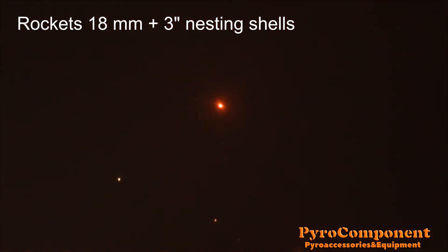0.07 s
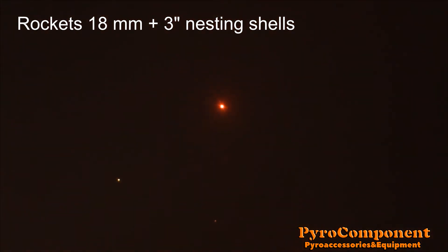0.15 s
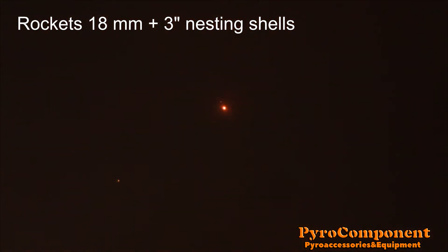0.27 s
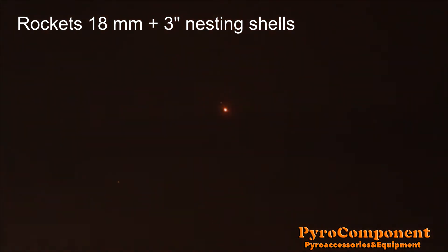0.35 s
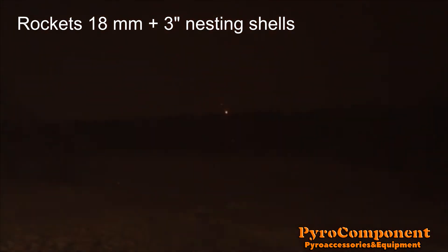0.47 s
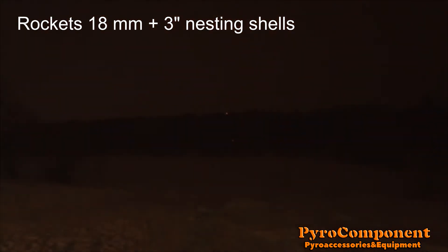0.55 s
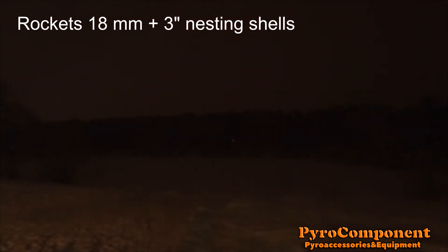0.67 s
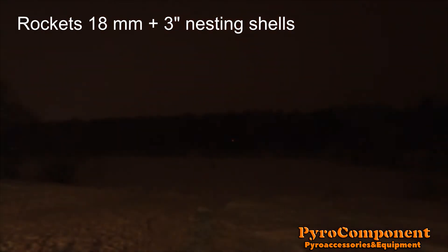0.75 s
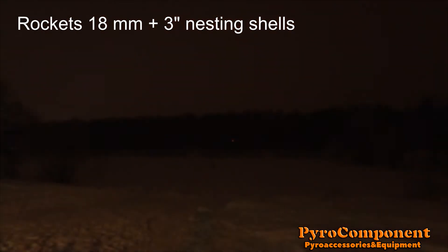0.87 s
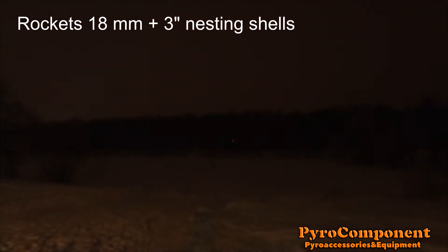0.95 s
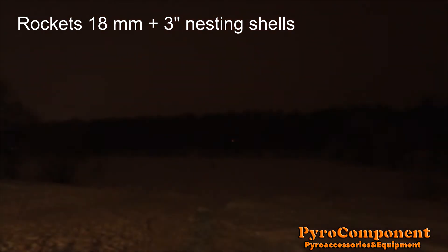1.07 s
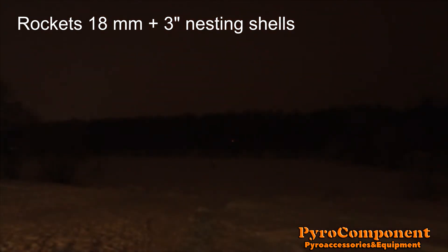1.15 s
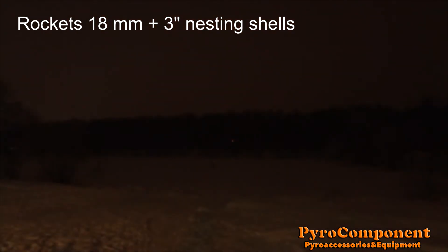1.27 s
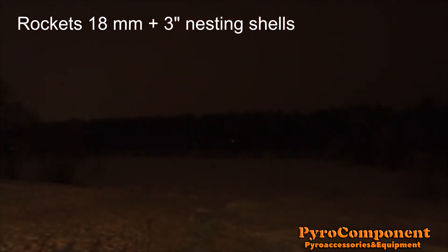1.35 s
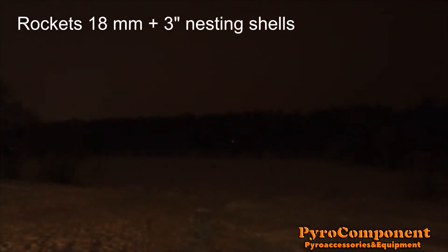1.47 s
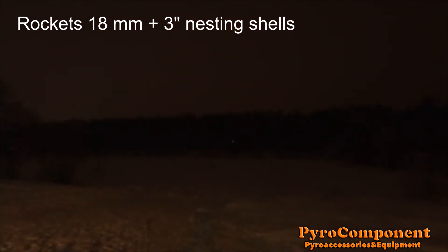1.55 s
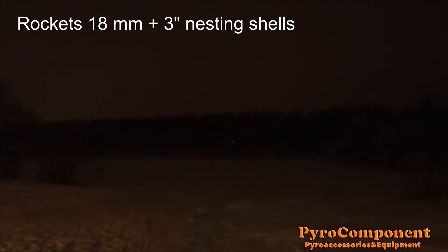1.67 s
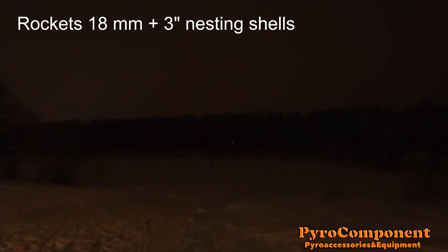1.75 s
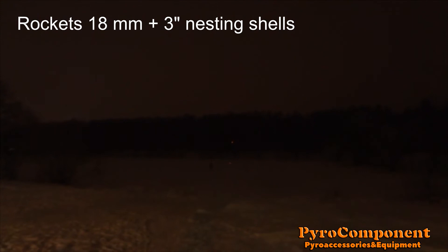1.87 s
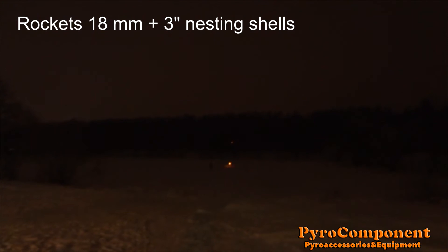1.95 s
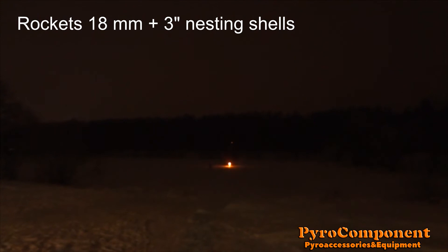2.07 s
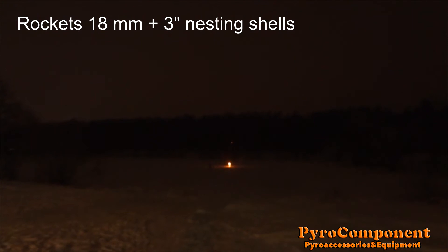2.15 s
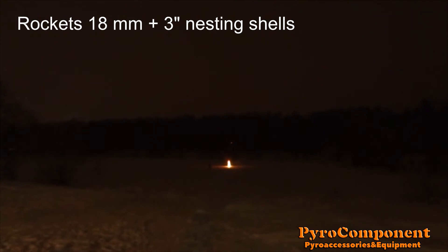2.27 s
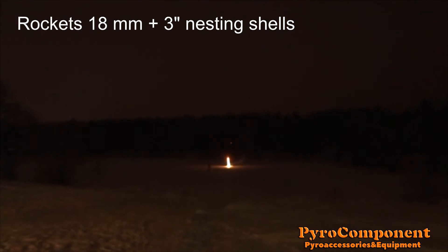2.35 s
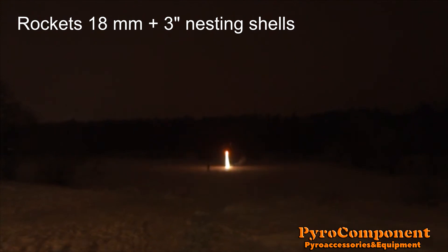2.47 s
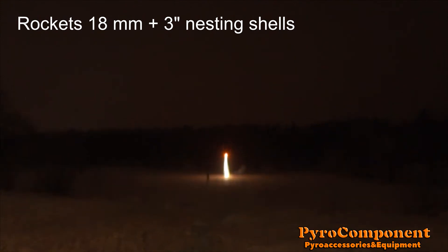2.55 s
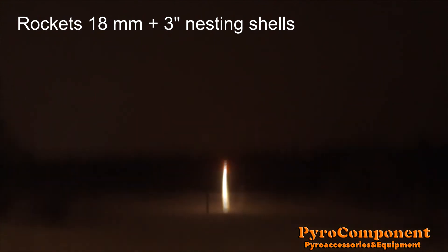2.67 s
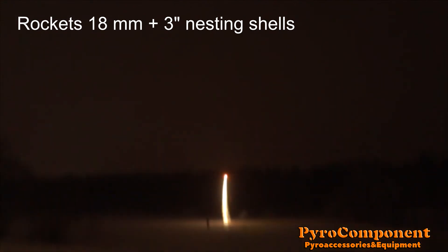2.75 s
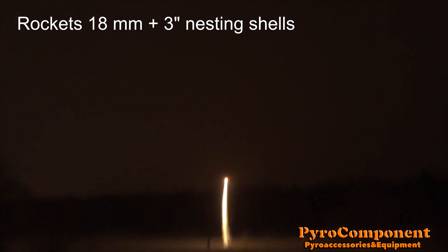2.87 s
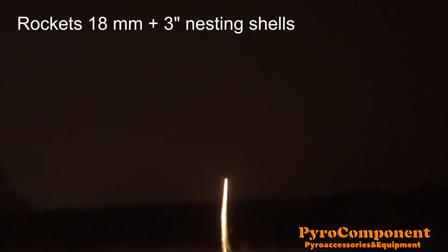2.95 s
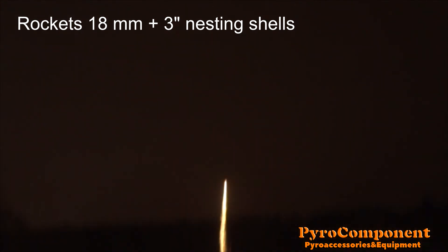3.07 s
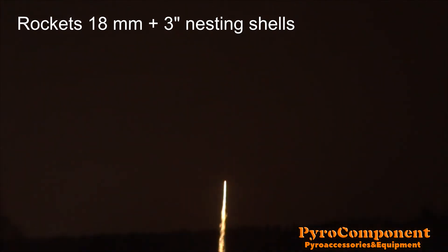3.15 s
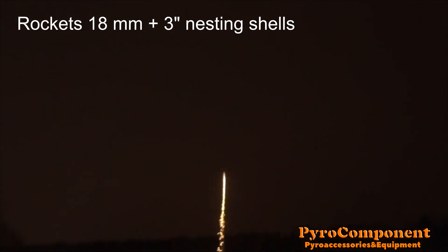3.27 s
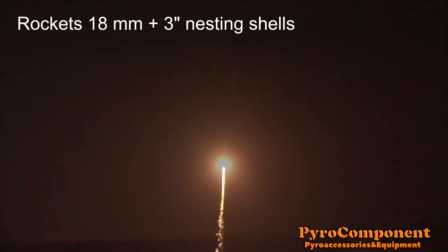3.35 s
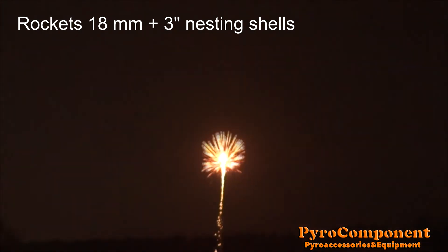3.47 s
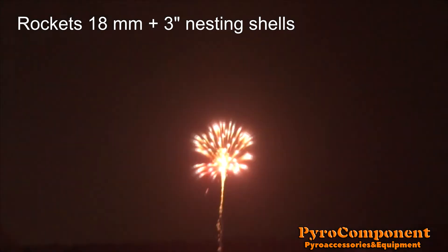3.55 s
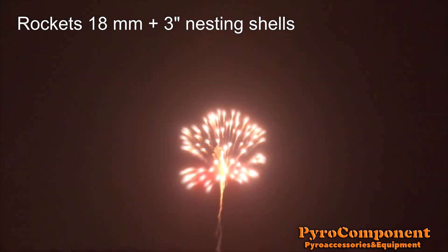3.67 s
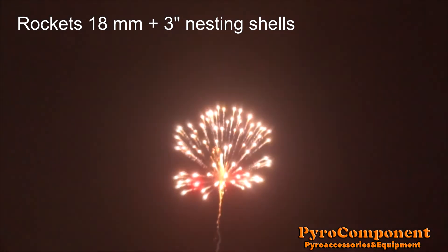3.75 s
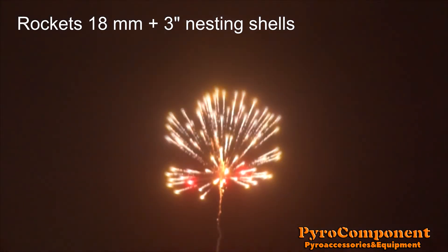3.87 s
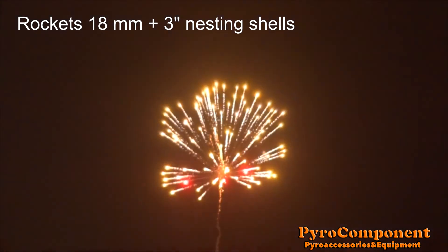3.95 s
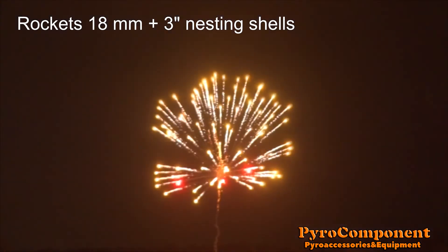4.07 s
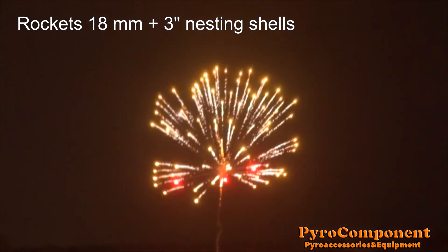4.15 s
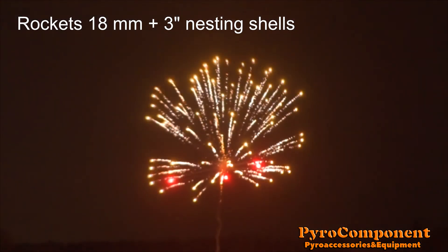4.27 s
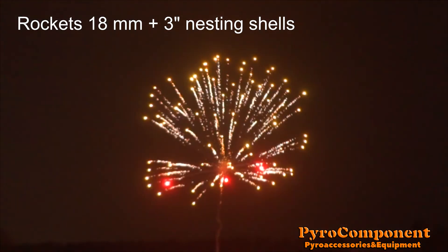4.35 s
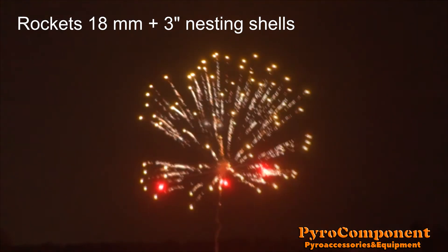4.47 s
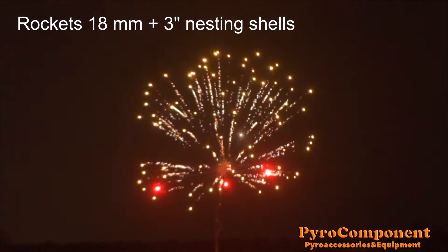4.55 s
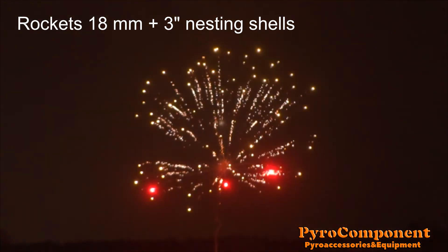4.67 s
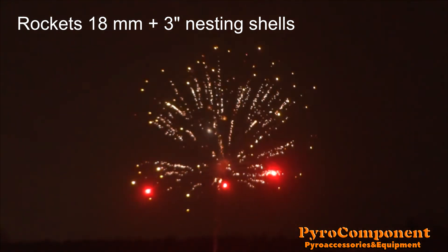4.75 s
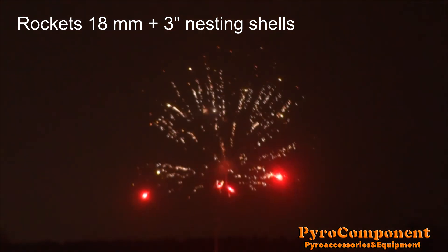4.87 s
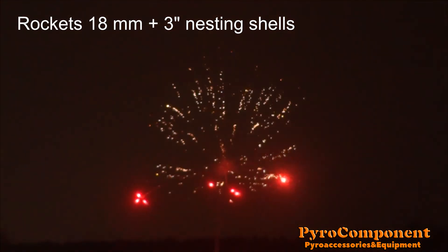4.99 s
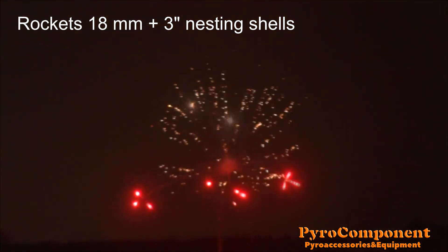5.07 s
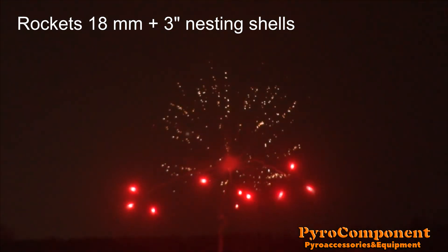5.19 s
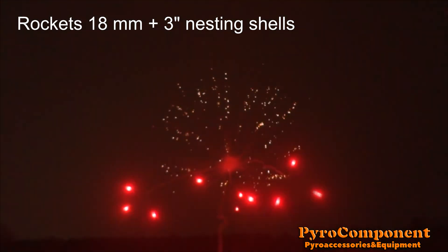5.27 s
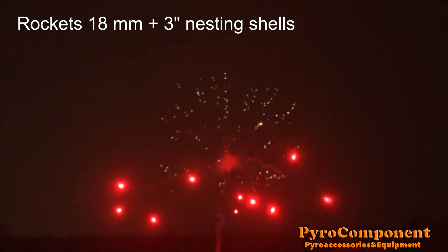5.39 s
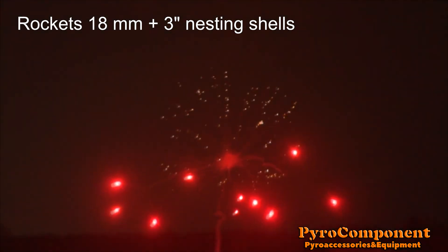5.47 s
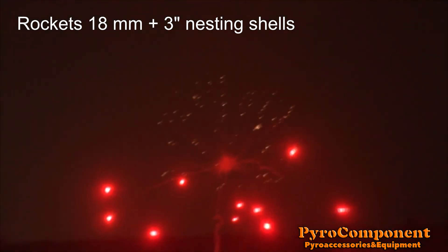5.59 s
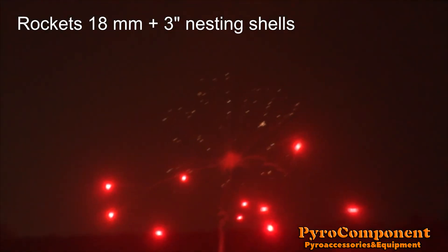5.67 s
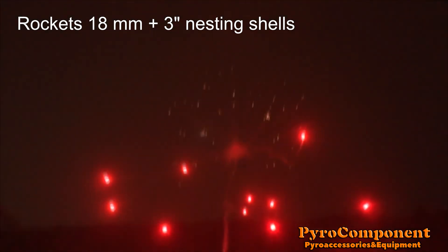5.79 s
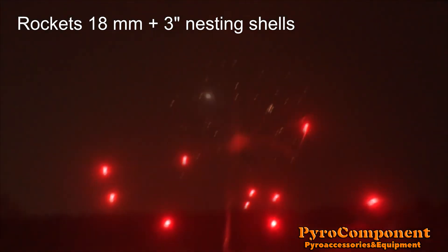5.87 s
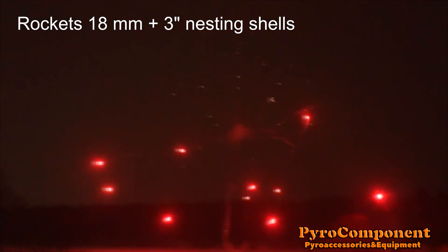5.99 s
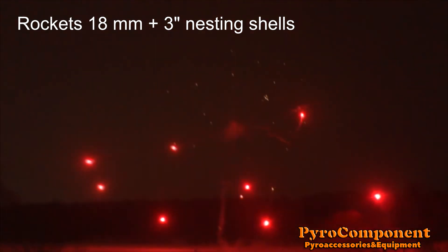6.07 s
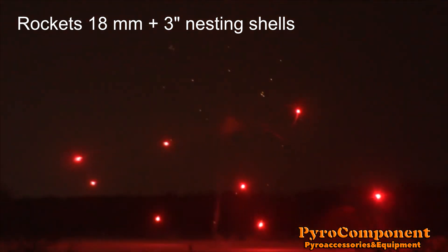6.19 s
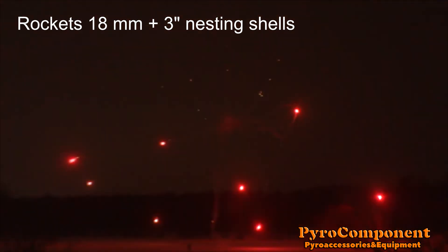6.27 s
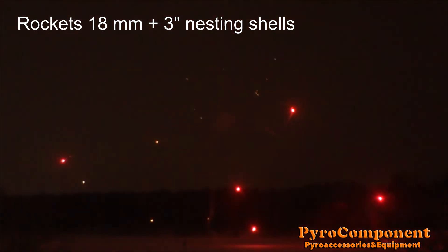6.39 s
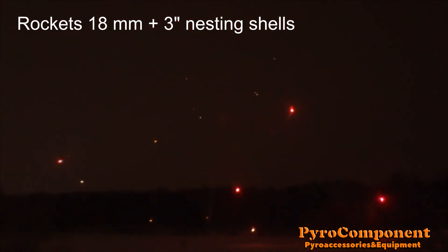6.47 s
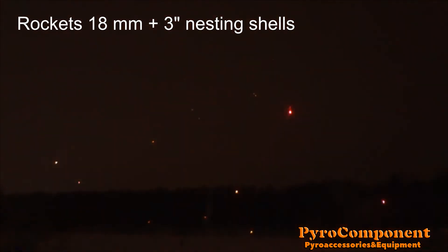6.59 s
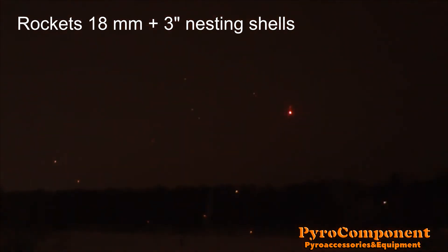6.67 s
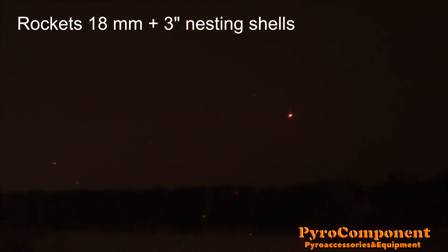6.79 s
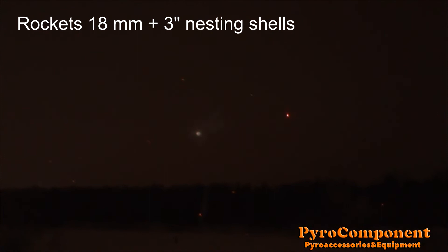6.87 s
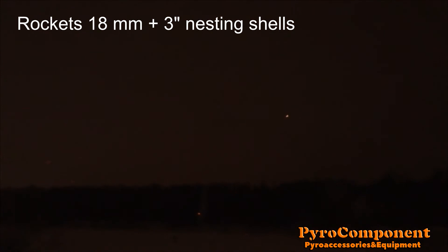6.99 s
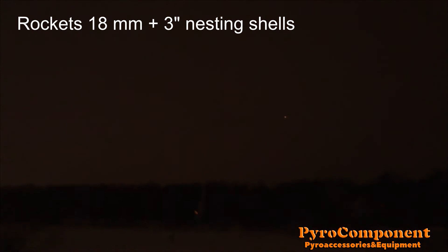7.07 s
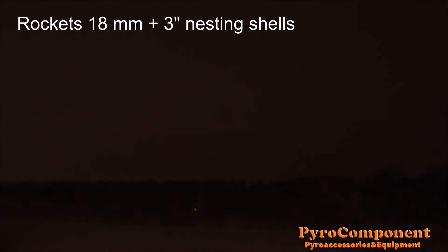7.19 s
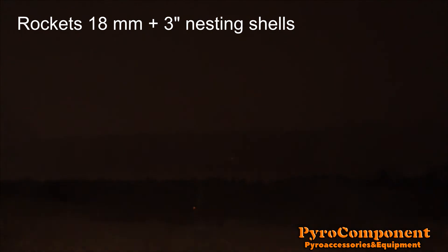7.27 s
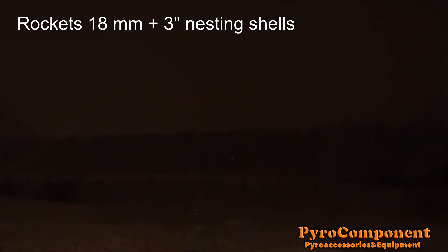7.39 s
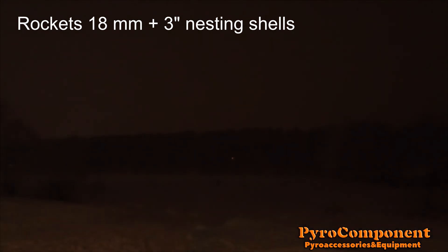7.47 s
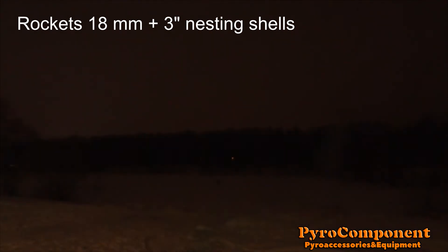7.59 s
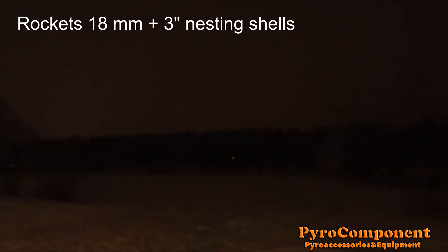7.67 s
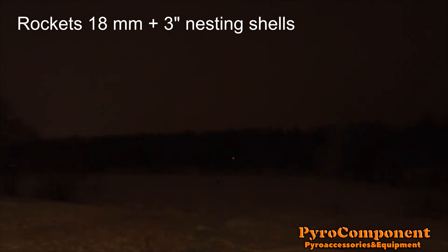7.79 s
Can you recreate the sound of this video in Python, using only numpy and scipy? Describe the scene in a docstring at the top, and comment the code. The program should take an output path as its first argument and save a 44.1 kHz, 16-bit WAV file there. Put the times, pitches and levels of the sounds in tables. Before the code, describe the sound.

Open snowy field at night, forest edge behind. At first the low, soft echo of an earlier firework dies away, gone by about 0.9 s, leaving faint still air and a very thin high whine. At 2.2 s a fuse hiss swells; around 2.3-2.5 s the motor catches with a piercing, wobbling squeal near 3 kHz. The rocket rushes up in a harsh exhaust roar, growing duller, with a raspy whistle sliding down until 3.2 s, then briefly rising and cutting off. At 3.7 s the shell bursts with a deep thud and a broad rolling echo. Scattered sharp cracks follow from 3.9 s, thickening into loud volleys from 4.8 to 5.5 s, again at 6.1-6.4 s, then sparse pops until 7.4 s. Trees return dense crackling reverberation. Close ticks sound throughout, notably at 2.65, 3.8 and 5.6 s, with soft hissy brushes around 5.5-6.5 s. The echoes fade by 7.7 s.

```python
"""Fireworks over a snowy field

Night, with a forest edge behind. The echo of one shell dies away, then a rocket lifts off with a squeal, a rush
of exhaust noise and a whistle from its tube. Its shell bursts and the stars crack one by one as short pulses;
the trees throw everything back as a rolling crackle of dense small echoes. Sharp ticks and soft brushes of hiss
sound right at the microphone, over still air and a thin whine; a limiter ducks after peaks above its ceiling."""
import sys
import numpy as np
from scipy import signal
from scipy.fft import rfft, irfft, next_fast_len
from scipy.io import wavfile
from scipy.ndimage import uniform_filter1d, minimum_filter1d

SR = 44100
rng = np.random.default_rng(int(sys.argv[2]) if len(sys.argv) > 2 else 0)


def pcm_store(signal):
    """Save signal as 16-bit PCM."""
    levels = np.round(np.clip(np.atleast_2d(signal), -1, 1) * 32767)
    wavfile.write(sys.argv[1], SR, levels.astype(np.int16).T)


N = 345303
T = np.arange(N) / SR   # time in seconds
SIZE = next_fast_len(N + SR)   # transform length, with a second to spare
HZ = np.maximum(np.arange(SIZE // 2 + 1) * SR / SIZE, 1)

# Spectrum of the still air. Each row: frequency in Hz, relative level in dB.
AIR_COLOUR = [(15, -41), (25, -8.5), (102, -10.5), (354, -1), (427, -1), (714, 0), (775, -5), (840, -1.5),
              (2220, -7), (3620, -14), (10400, -19), (14000, -18.5), (16000, -22.5)]
AIR_DB = -60.5   # rms level
# How alike left and right hear the air. Each row: frequency in Hz, likeness from -1 to 1.
AIR_LIKENESS = [(60, 0.81), (130, 0.89), (290, 0.37), (640, -0.22), (1410, -0.68), (3100, -0.09),
                (6820, 0.53), (15000, 1)]
# Thin electronic whine. Each row: frequency in Hz, rms level in dB.
WHINE = [(13487, -76), (13907, -82)]
# Left-right likeness of the echoes and the brushes. Each row: frequency in Hz, likeness from -1 to 1.
LIKENESS = [(50, .94), (170, 1), (550, 0.98), (1600, 0.83), (5000, 0.81), (13000, 0.99)]

# Soft brushes of hiss close by. Each row: middle in seconds, length in seconds, level at the middle in dB.
BRUSHES = [(5.6, 0.15, -44), (5.735, .08, -49.5), (5.885, 0.071, -48), (6.027, 0.15, -46.5),
           (6.483, 0.1, -50)]
# Spectrum of the brushes. Each row: frequency in Hz, relative level in dB.
BRUSH_COLOUR = [(1500, -40), (5000, -7), (7500, 1), (11000, -4), (15500, -4)]
# Ticks at the microphone. Each row: time in seconds, relative level in dB, left-right difference in dB,
# brightness in dB per octave.
TICKS = [(0.018, -24.5, 6, 6), (0.6982, -19, 4, -0.5), (2.6468, 3, 6.5, 1), (3.7733, -3, 2, 2),
         (3.8187, -6, 8, 2), (5.5674, -12, 7, 3), (5.6346, 3, -2.5, 5.5), (5.979, -23.5, 14, 1),
         (7.019, -8, 5, -8.5), (7.335, -14.5, 5, -10)]
# Resonances of the ticking part. Each row: frequency in Hz, relative level in dB, 60 dB decay in seconds.
TICK_MODES = [(1900, -23, .005), (3300, 0, 0.0021), (4500, -6, 0.0093), (5700, -2.5, 0.0035),
              (7820, -1, 0.0039), (10230, 1.5, 0.0042), (10000, -36, .09), (13400, -8, 0.0096)]

# Zones of the echoes: rumble, body, crackle, hiss, sizzle. Each row: low edge in Hz, high edge in Hz.
ECHO_ZONES = [(120, 350), (450, 1500), (2200, 3600), (4800, 6500), (8500, 13000)]
# Last of an earlier shell's echo, a row for each of the four lower zones; it has no sizzle left.
# Each row: level at the start in dB, fall in dB per second.
OLD_ECHO = [(-52, 12), (-41, 14), (-67, 22), (-74.5, 11)]
# Spectra of the old echo, the burst's echo and the stars' echo. Each row: frequency in Hz, relative level in dB.
OLD_COLOUR = [(35, -69), (60, -39), (133, -32), (188, -9), (427, -5.5), (574, -1.5), (1110, -7),
              (2710, -32), (3640, -30), (8480, -40), (14000, -37)]
BURST_COLOUR = [(30, -39), (60, -35), (105, -30), (150, -16.5), (220, -2.5), (320, 0), (650, 3),
                (1150, -1.5), (1600, -7.5), (2700, -13), (4200, -20.5), (6300, -32.5), (10400, -42.5),
                (15500, -52.5)]
STAR_COLOUR = [(30, -33.5), (105, -27.5), (220, -9), (650, 1), (1150, 1.5), (1700, -0.5), (2700, -4),
               (4000, -15), (5500, -22), (7500, -28), (10400, -34), (15500, -46)]
# Each echo's level is faded down to nothing. The row: end in seconds, length of the fade in seconds.
OLD_FADE = (0.86, 0.35)
NEW_FADE = (7.666, 0.32)
# Echo of the burst from the forest edge and from its depth, a row for each of the five zones.
# Each row: top level in dB, swell in dB, time to the top in seconds, fall in dB per second.
BURST_NEAR = [(-23, 5.5, 0.2, 50), (-17.5, 7, 0.23, 41.5), (-26.5, 7, 0.18, 47), (-33, 9, .12, 55),
              (-32, 9, .11, 91)]
BURST_FAR = [(-26, 6.1, 0.94, 11.4), (-21.5, 4, 0.78, 7.06), (-34, 5.8, .5, 12.7), (-50, 5, 0.51, 26),
             (-68, 5, .38, 46)]
# The same for a report, its top level relative to the report's strength towards the trees.
STAR_NEAR = [(-51, 5, .08, 60), (-28.5, 12, 0.061, 71), (-30, 8.7, 0.063, 88), (-43.5, 10.7, .08, 120),
             (-52.5, 12, 0.073, 145)]
STAR_FAR = [(-55.5, 5, .3, 14), (-38.5, 5.5, 0.28, 15), (-43, 5.6, 0.15, 18.3), (-63, 5, 0.15, 32),
            (-74, 5, .2, 35)]
# Wandering level of the two lowest echo zones. The row: spread in dB, drift rate in Hz.
SURGING = (1.18, 7)

# Flight: the height grows with an even acceleration from lift-off.
IGNITION_S, LIFTOFF_S, BURNOUT_S, CLIMB_M_PER_S2 = 2.32, 2.5, 3.16, 80
BURST_S = 3.708
# Lag of the jet's reflection off the snow: on the ground, and its growth with height.
SNOW_LAG_MS, SNOW_LAG_MS_PER_M = .2, .255
# Zones of the jet: rumble, body, hiss, sizzle. Each row: low edge in Hz, high edge in Hz.
JET_ZONES = [(140, 400), (600, 1200), (3800, 6000), (8000, 14000)]
# Exhaust, a row for each of the four jet zones. Each row: level at full thrust in dB, dB lower at ignition,
# time to full thrust in seconds, loss in dB per metre of height, fall after burn-out in dB per second.
JET_VOICE = [(-62.5, 5, .31, 0.04, 31.5), (-27, 22, 0.3, 0, 64.5), (-23, 11, 0.22, 0.97, 24.5),
             (-28.5, 30, 0.2, 1.85, 10)]
# Spectrum of the jet. Each row: frequency in Hz, relative level in dB.
JET_COLOUR = [(60, -51), (120, -35), (175, -9), (290, -12), (400, -8), (500, -2.5), (800, 3), (1200, 4.5),
              (1700, 4.5), (2300, -1), (3000, 4.5), (5500, -3), (8000, -15.5), (11500, -20), (15500, -39)]
# Left-right likeness of the jet. Each row: frequency in Hz, likeness from -1 to 1.
JET_LIKENESS = [(60, 1), (500, 1), (1600, 0.97), (5000, 0.96), (14000, 1)]
# Low surge as the exhaust clears the ground. The row: start in seconds, end in seconds, rise in seconds,
# lift of the rumble in dB, sag in dB per second.
SURGE = (2.725, 3.21, .045, 24.1, 21)
# The motor squeals as it catches. Each row: time in seconds, pitch in Hz, level in dB, roughness from 0 to 1.
SQUEAL = [(2.22, 2900, -74, 1), (2.317, 3250, -47, 1), (2.327, 3500, -18, .15), (2.358, 3780, -18, .4),
          (2.39, 3450, -20, .85), (2.42, 2560, -18, .5), (2.447, 2780, -12, .1), (2.48, 2660, -23, .9),
          (2.6, 2500, -40, 1)]
# It whistles in flight. Each row: time in seconds, pitch in Hz, level in dB, roughness from 0 to 1.
WHISTLE = [(2.76, 2300, -36, 1), (2.81, 2230, -27, .9), (2.92, 1860, -26, 1), (2.96, 1760, -16, .8),
           (3.04, 1650, -16, .85), (3.09, 1565, -11.5, .8), (3.17, 1425, -10.5, .75),
           (3.2, 1500, -12.5, .15), (3.26, 1660, -12, .08), (3.34, 1870, -26, .1)]
# Overtones of squeal and whistle. Each row: multiple of the pitch, relative level in dB.
OVERTONES = [(2, -9), (3, -22), (4, -38)]

# Deep thud of the burst. The row: pitch in Hz, starting level in dB, 60 dB decay in seconds.
THUD = (150, -25.5, .2)
# Reports of the shell and its stars. Each row: time in seconds, pulse height in dB,
# strength towards the trees in dB.
CRACKS = [(0.1602, -27.5, -46), (3.7075, -12, 0.5), (3.939, -11, -3), (3.972, -6.5, -10), (4.2261, -7, -12),
          (4.2434, -5, -16), (4.253, -8, -19), (4.3011, -7.5, -20), (4.3416, 0.5, -12),
          (4.4471, -13.5, -24), (4.557, 0, -18), (4.7747, 1, -5), (4.8136, -1, -6), (4.839, 2, -5.5),
          (4.8445, -4, -7), (4.9018, 2, -4), (4.9076, -3, -6), (4.9177, 2, -2.5), (5.0215, 1.5, -3),
          (5.0958, 1, -6), (5.103, -3, -6), (5.1370, -0.5, -2.5), (5.2173, 0, -0.5), (5.2269, 0, -2.5),
          (5.2387, -6, -4), (5.2940, -3, -1.5), (5.302, -0.5, 1), (5.3312, -11, 1), (5.4263, 0, 3.5),
          (5.4462, 0.5, -0.5), (5.5846, -7, -13), (5.8165, -10, -18), (6.1429, -4.5, -2.5),
          (6.2390, -2, -4.5), (6.2786, 2, -1), (6.3215, -14, -9), (6.3840, -12, -25), (6.3932, -6, -20),
          (6.7654, -20, -24.5), (6.8, -22.5, -32), (6.9183, -6.5, -3), (6.9565, -16, -33),
          (7.2673, -6, -10), (7.3066, -18, -24), (7.3775, -19.5, -14.5)]
# A report as it arrives. Each row: frequency in Hz, width in Hz, relative level in dB.
REPORT_MODES = [(740, 610, 0), (1000, 2300, -3.6)]


def from_db(db):
    """Decibels to gain."""
    return 10 ** (np.asarray(db) / 20)


def rms_one(x):
    """Scale to rms 1."""
    return x / np.sqrt(np.mean(x ** 2) + 1e-20)


def in_time(rows):
    """Each column of a curve, sample by sample."""
    s, *columns = np.transpose(rows)
    return [np.interp(T, s, c) for c in columns]


def at_hz(points):
    """A spectrum on the frequency grid, joined along log frequency."""
    hz, value = np.transpose(points)
    return np.interp(np.log(HZ), np.log(hz), value)


def during(start, end, fade):
    """One between two times, with linear ramps inside them."""
    return np.clip((T - start) / fade, 0, 1) * np.clip((end - T) / fade, 0, 1)


def drift(rate):
    """Smooth random wandering of rms 1: noise through two equal low-pass poles."""
    r = np.exp(-2 * np.pi * rate / SR)
    noise = rng.standard_normal(N + SR)
    return rms_one(signal.lfilter([1], [1, -2 * r, r * r], noise)[SR:])   # settled part only


def butter(x, hz, kind, order=2):
    """Butterworth filter."""
    return signal.sosfilt(signal.butter(order, hz, kind, fs=SR, output="sos"), x + 1e-18)


def late(x, seconds):
    """Delay by a fixed or moving lag."""
    return np.interp(T - seconds, T, x, left=0)


def clicks(times, heights):
    """Single impulses."""
    out = np.zeros(N)
    out[np.round(np.asarray(times) * SR).astype(int)] = heights
    return out


def stereo(pair, colour, likeness=LIKENESS):
    """Two unrelated signals become coloured left and right spectra of a given likeness, via mid and side."""
    mid, side = rfft(pair, SIZE) * from_db(at_hz(colour))
    alike = np.clip(at_hz(likeness), -1, 1)
    return np.sqrt(1 + alike) * mid + np.sqrt(1 - alike) * side * np.array([[1], [-1]])


def grains(per_s, spread_db):
    """Two dense streams of clicks of uneven size."""
    born = rng.random((2, N)) < per_s / SR
    heights = rng.standard_normal((2, N))
    extra_db = spread_db * np.minimum(rng.exponential(1, (2, N)), 4)
    return rms_one(born * heights * from_db(extra_db))


def voiced(spectra, zones, levels):
    """Give each frequency zone that has a level its own moving level; neighbours overlap smoothly."""
    out = 0
    edges = np.log(np.ravel(zones))
    for k, ((low, high), level_db) in enumerate(zip(zones, levels)):
        share = np.interp(np.log(HZ), edges, np.repeat(np.arange(len(zones)) == k, 2))
        in_zone = spectra[:, (HZ > low) & (HZ < high)]
        zone_rms = np.sqrt(np.sum(np.abs(in_zone) ** 2) / (SIZE * N))
        band = irfft(spectra * share, SIZE)[:, :N]
        out = out + band / zone_rms * from_db(level_db)
    return out


def scatter(x, t60, build_s):
    """Countless trunks each return a faint copy; the returns build up, then die."""
    t = T[:SR]
    envelope = from_db(-60 * t / t60) * (1 - np.exp(-t / build_s))
    returns = rng.standard_normal((2, SR)) * envelope
    response = stereo(returns / np.sqrt(np.sum(returns ** 2)), [(1, 0), (SR, 0)])
    return irfft(response * rfft(x, SIZE), SIZE)[:, :N]


def coloured_hiss(colour, likeness=LIKENESS):
    """Steady stereo noise of a given spectrum, rms 1."""
    return rms_one(irfft(stereo(rng.standard_normal((2, N)), colour, likeness), SIZE)[:, :N])


def night():
    """Still air from all sides and microphone hiss as one coloured noise, plus steady sines for the whine."""
    air = coloured_hiss(AIR_COLOUR, AIR_LIKENESS)
    whine = sum(np.sqrt(2) * from_db(db) * np.sin(2 * np.pi * hz * T) for hz, db in WHINE)
    return from_db(AIR_DB) * air + whine


def brushes():
    """Short, soft swells of high hiss, each rising and falling in a straight line."""
    swells = sum(from_db(db) * during(s - length / 2, s + length / 2, length / 2) for s, length, db in BRUSHES)
    return coloured_hiss(BRUSH_COLOUR) * swells


def ticks(gain_db=-12.5):
    """A small hard part near the microphone clicks and rings briefly, reaching each side a little differently."""
    s, level_db, pan_db, tilt = np.transpose(TICKS)
    out = np.zeros((2, N))
    for k, (hz, mode_db, t60) in enumerate(TICK_MODES):
        r, w = from_db(-60 / (t60 * SR)), 2 * np.pi * hz / SR
        hit_db = level_db + mode_db + gain_db + tilt * np.log2(hz / 7500)
        hits = []
        for side in (1, -1):
            uneven_db = rng.normal(0, 0.83, len(s))
            hits.append(clicks(s, from_db(hit_db + side * pan_db / 2 + uneven_db)))
        ringing = signal.lfilter([0, np.sin(w)], [1, -2 * r * np.cos(w), r * r], np.array(hits) + 1e-18)
        out += (-1) ** k * ringing
    return butter(out, 900, "high")


def echo_levels(reports, near, far):
    """Zone levels: each report (s, dB) starts a near and a far echo that swell and fall; their powers add."""
    s, db = np.transpose(reports)
    sent = clicks(s, from_db(db) ** 2)
    levels = []
    for echoes in zip(near, far):
        power = 0
        for top_db, swell_db, top_s, fall in echoes:
            below_top_db = swell_db * np.maximum(1 - T / top_s, 0) + fall * np.maximum(T - top_s, 0)
            power = power + from_db(top_db - below_top_db) ** 2
        zone_power = signal.fftconvolve(sent, power)[:N]
        levels.append(10 * np.log10(np.maximum(zone_power, 1e-14)))
    return levels


def roll(levels, colour, fade, per_s, spread_db, lumps_db):
    """Reports return from the trees as a dense, lumpy hail of small echoes, with a moving level by zone."""
    hail = grains(per_s, spread_db) * from_db(lumps_db * drift(59))
    depth_db, rate = SURGING
    levels = [level + depth_db * drift(rate) for level in levels[:2]] + levels[2:]
    end_s, length_s = fade
    sinking = np.clip((end_s - T) / length_s, 0, 1) ** 1.1
    return voiced(stereo(hail, colour), ECHO_ZONES, levels) * sinking


def old_echo():
    """The earlier shell's roll, its four lower zones falling in dB at their own rates."""
    levels = [db - fall * T for db, fall in OLD_ECHO]
    return roll(levels, OLD_COLOUR, OLD_FADE, per_s=9000, spread_db=0.5, lumps_db=0.5)


def burst_echo():
    """The trees answer the burst, near edge and far depth together."""
    levels = echo_levels([(BURST_S, 0)], BURST_NEAR, BURST_FAR)
    return roll(levels, BURST_COLOUR, NEW_FADE, per_s=9000, spread_db=0.93, lumps_db=1.28)


def star_echoes():
    """The trees answer every listed report by its strength towards them."""
    reports = [(s, echo_db) for s, _, echo_db in CRACKS]
    levels = echo_levels(reports, STAR_NEAR, STAR_FAR)
    return roll(levels, STAR_COLOUR, NEW_FADE, per_s=6000, spread_db=1.6, lumps_db=1.5)


def fuse(start_s=2.2, level_db=-52, swell_db_per_s=200, low_hz=2200, high_hz=4800):
    """A thin hiss swells up as the flame reaches the motor."""
    hiss = rms_one(butter(rng.standard_normal(N), [low_hz, high_hz], "band"))
    swell_db = level_db - swell_db_per_s * np.maximum(IGNITION_S - T, 0)
    return hiss * from_db(swell_db) * during(start_s, LIFTOFF_S, .03)


def jet(flutter_db=1.83, snow_share=0.58, near_share=.3, near_lag_s=.0018, echo_db=-16.5,
        chuff_depth_db=2.5, catch_s=0.055):
    """Turbulent exhaust, duller as it climbs; its inverted reflection off the snow sweeps a comb downwards."""
    height_m = CLIMB_M_PER_S2 / 2 * np.maximum(T - LIFTOFF_S, 0) ** 2
    waver = 1 + .04 * drift(40)   # the plume wavers
    lag_s = (SNOW_LAG_MS + SNOW_LAG_MS_PER_M * height_m) * waver / 1000
    rush = [noise - snow_share * late(noise, lag_s) + near_share * late(noise, near_lag_s)
            for noise in rng.standard_normal((2, N))]
    levels = []
    for full_db, weak_db, rise_s, loss, fall in JET_VOICE:
        catching_db = weak_db * np.clip(1 - (T - IGNITION_S) / rise_s, 0, 1)
        dying_db = fall * np.maximum(T - BURNOUT_S, 0)
        levels.append(full_db - catching_db - loss * height_m - dying_db)
    start, end, rise_s, surge_db, sag = SURGE
    levels[0] = levels[0] + during(start, end, rise_s) * (surge_db - sag * (T - start))
    sound = voiced(stereo(np.array(rush), JET_COLOUR, JET_LIKENESS), JET_ZONES, levels)
    # the burn pulses at a wavering 85 Hz or so, around its end
    chuffs = np.sin(2 * np.pi * np.cumsum(85 + 12 * drift(15)) / SR) * during(2.93, 3.22, .04)
    flutter = from_db(chuff_depth_db * chuffs + flutter_db * drift(110))
    sound = sound * flutter * during(IGNITION_S, BURST_S, catch_s)
    sent = butter(sound[0], [300, 2800], "band", order=4)
    return sound + from_db(echo_db) * scatter(sent, t60=2.9, build_s=0.076)


def tube_tone(curve, overtone_db):
    """The motor's tube sings; turbulence shakes its pitch and level into a rasp with stronger overtones."""
    pitch, level, rough = in_time(curve)
    eddies = (drift(100) + 1j * drift(100)) / np.sqrt(2)
    swing = np.sqrt(1 - rough ** 2) + rough * eddies
    swing = swing * np.sqrt(1.3 / (.3 + np.abs(swing) ** 2))   # the tube saturates
    phase = 2 * np.pi * np.cumsum(pitch * (1 + .03 * rough * drift(120))) / SR
    shrill = from_db(overtone_db) * (.35 + rough)
    overtones = sum(from_db(db) * np.exp(1j * k * phase) for k, db in OVERTONES)
    partials = np.exp(1j * phase) + shrill * overtones
    tone = butter(np.imag(swing * partials), [700, 5500], "band")
    return tone * np.sqrt(2) * from_db(level) * during(curve[0][0], curve[-1][0], .01)


def whistle(squeal_echo_db=-12.0, flight_echo_db=-8.0, pan_db=0.5):
    """Squeal at the start and whistle aloft; from higher up the sound reaches more of the forest."""
    squeal = tube_tone(SQUEAL, overtone_db=-6.5)
    flight = tube_tone(WHISTLE, overtone_db=-2.5)
    direct = (squeal + flight) * from_db([[pan_db / 2], [-pan_db / 2]])
    sent = from_db(squeal_echo_db) * squeal + from_db(flight_echo_db) * flight
    return direct + scatter(butter(sent, 3800, "low", order=6), t60=2.03, build_s=.02)


def thud():
    """The shell's pressure wave arrives as a deep sine that dies quickly."""
    hz, start_db, t60 = THUD
    age = np.maximum(T - BURST_S, 0)
    return np.sin(2 * np.pi * hz * age) * from_db(start_db - 60 * age / t60)


def cracks(scatter_db=-15.0, thump_db=-20.0):
    """Each report is a short pulse dulled by distance, with a bright edge, faint thump and near reflections."""
    s, height_db, _ = np.transpose(CRACKS)
    hits, pulse = clicks(s, from_db(height_db)), 0
    for k, (hz, width, db) in enumerate(REPORT_MODES):
        r, w = np.exp(-np.pi * width / SR), 2 * np.pi * hz / SR
        mode = signal.lfilter([1 - r * r, 0, r * r - 1], [1, -2 * r * np.cos(w), r * r], hits + 1e-18)
        pulse = pulse + (-1) ** k * from_db(db) * mode
    pulse = butter(pulse, 4050, "low", order=3)
    body = pulse * hits.max() / np.abs(pulse).max()
    edge = from_db(-16) * butter(late(hits, 9 / SR), 11000, "low", order=3)
    thump = from_db(thump_db) * butter(hits, 90, "low")
    report = body + edge + thump
    first_return = 0.18 * late(report, 0.001806)
    second_return = 0.21 * butter(late(report, 0.0079), 2500, "low")
    halo = from_db(scatter_db) * scatter(report, t60=0.015, build_s=.002)
    return report + first_return + second_return + halo


def scene():
    """Old echo, launch, burst and stars over the quiet field."""
    close_by = night() + brushes() + ticks()
    forest = old_echo() + burst_echo() + star_echoes()
    rocket = fuse() + jet() + whistle()
    return close_by + forest + rocket + thud() + cracks()


def record(dry, treble_weight=1.92, release_db_per_s=170, ceiling_db=-3.2, cutoff_hz=15700):
    """A fast limiter, keener on treble, ducks after peaks over its ceiling; a steep filter cuts the top."""
    slope = np.abs(np.diff(dry, prepend=0))   # grows with treble
    sensed = np.maximum(np.abs(dry), treble_weight * slope).max(axis=0)
    over_db = np.maximum(20 * np.log10(sensed + 1e-9) - ceiling_db, 0)
    # instant catch, then a straight release in dB
    duck_db = np.maximum.accumulate(over_db + release_db_per_s * T) - release_db_per_s * T
    gain_db = uniform_filter1d(minimum_filter1d(-duck_db, size=61), size=61)
    top_cut = signal.ellip(10, .1, 80, cutoff_hz, fs=SR, output="sos")
    return signal.sosfilt(top_cut, dry * from_db(gain_db))


dry = scene()
out = record(dry)
pcm_store(out)
```